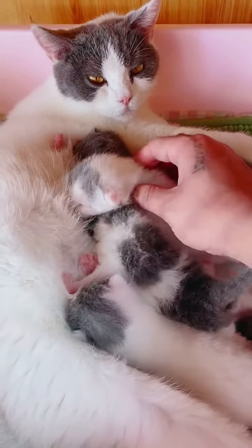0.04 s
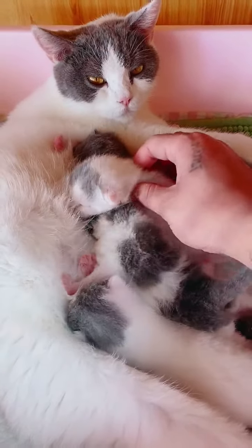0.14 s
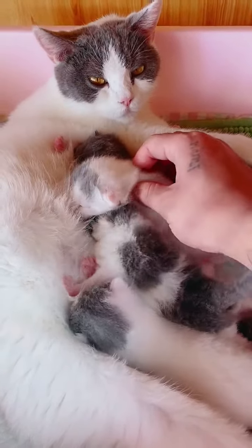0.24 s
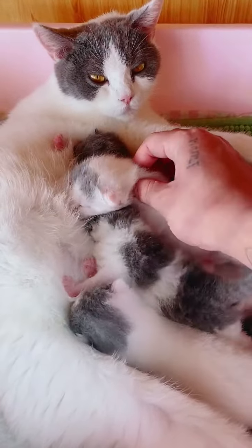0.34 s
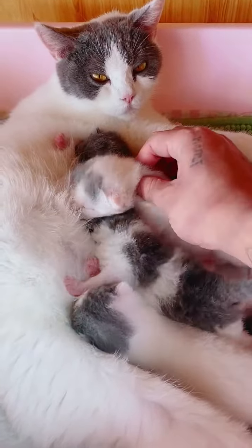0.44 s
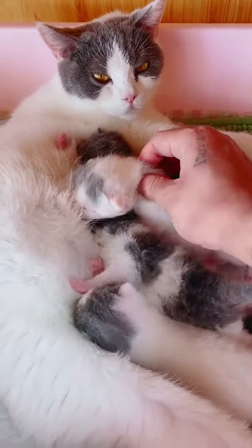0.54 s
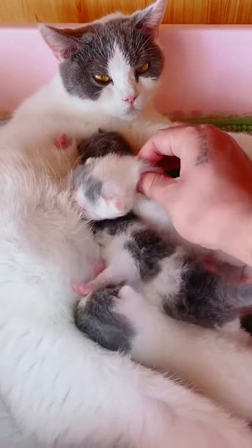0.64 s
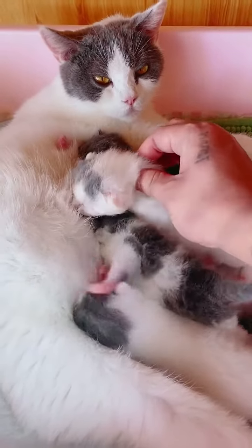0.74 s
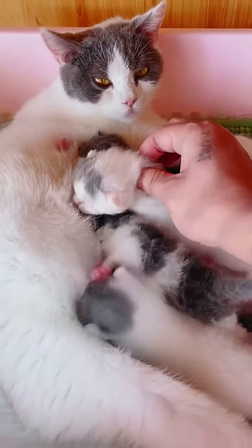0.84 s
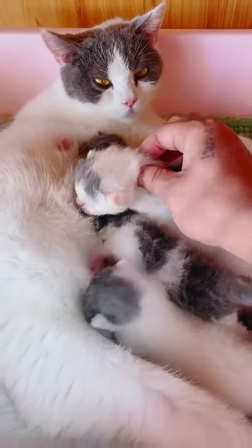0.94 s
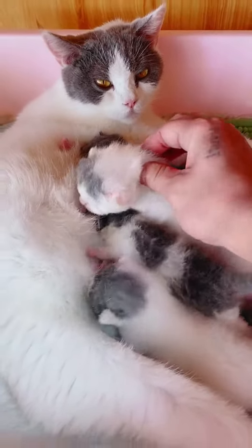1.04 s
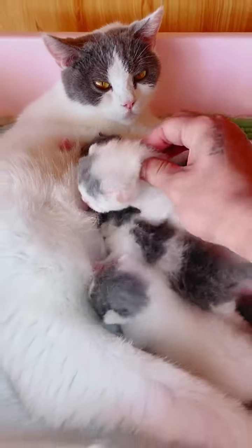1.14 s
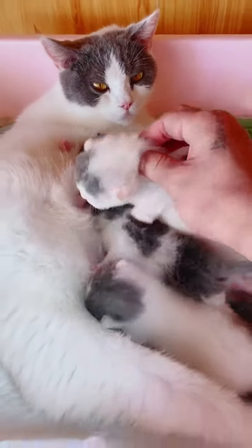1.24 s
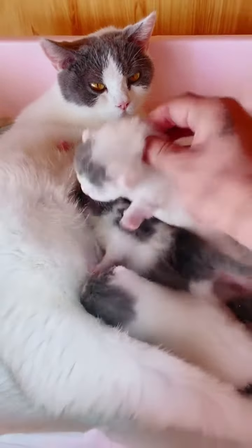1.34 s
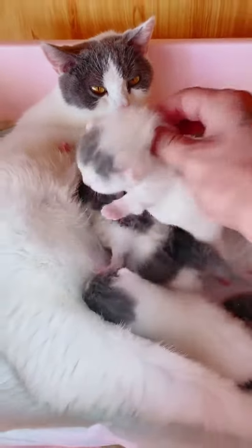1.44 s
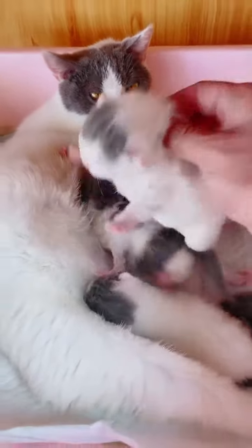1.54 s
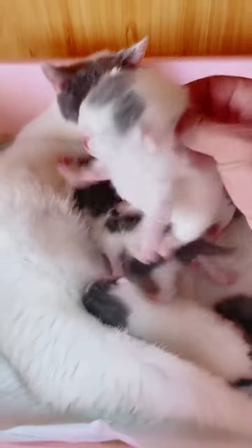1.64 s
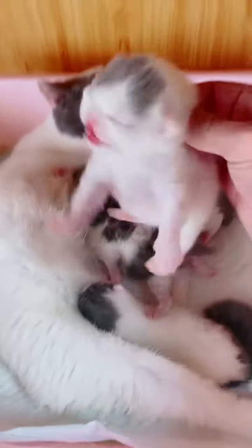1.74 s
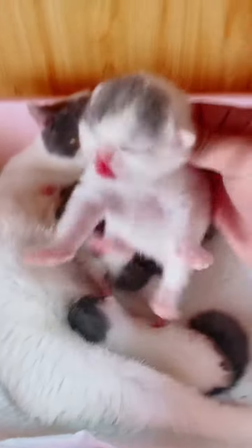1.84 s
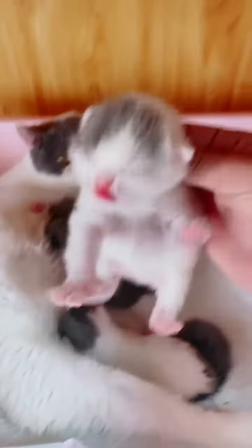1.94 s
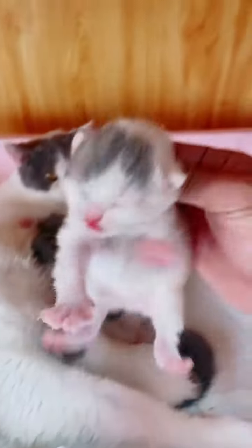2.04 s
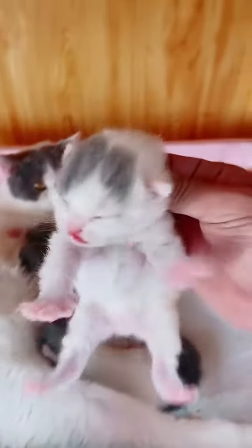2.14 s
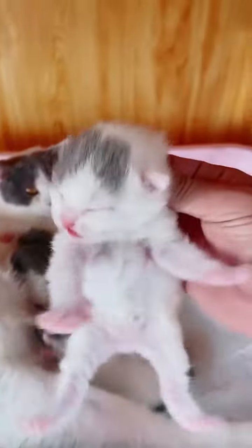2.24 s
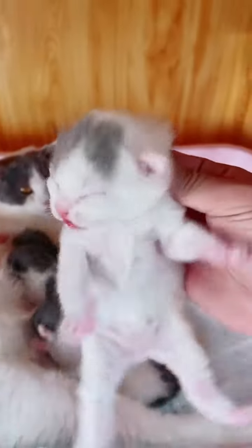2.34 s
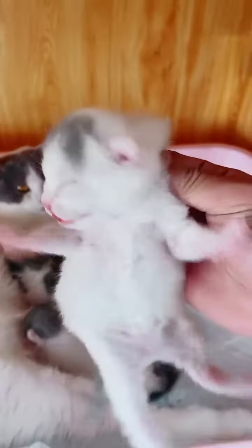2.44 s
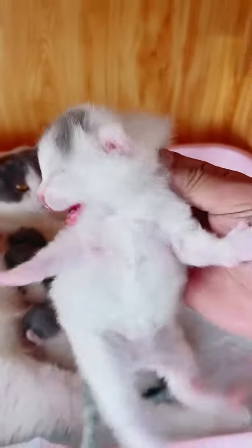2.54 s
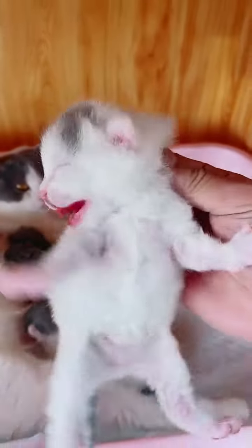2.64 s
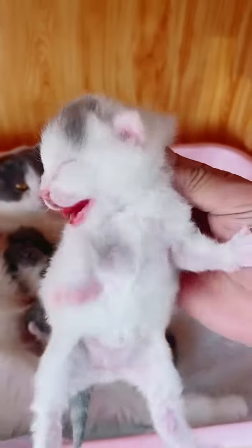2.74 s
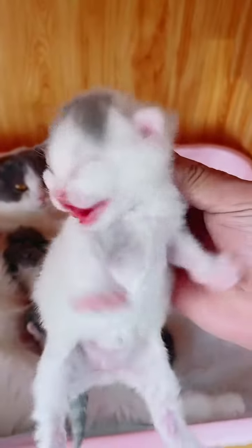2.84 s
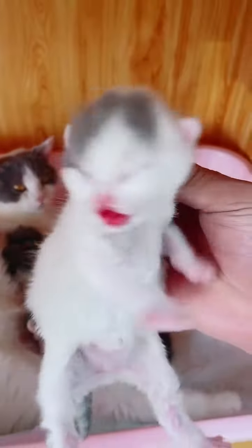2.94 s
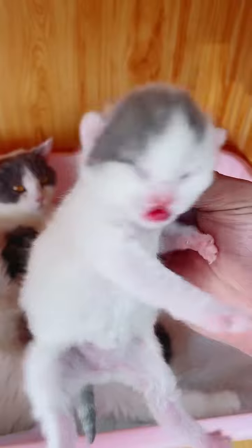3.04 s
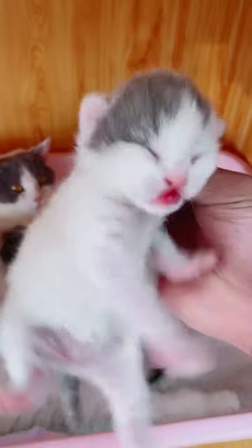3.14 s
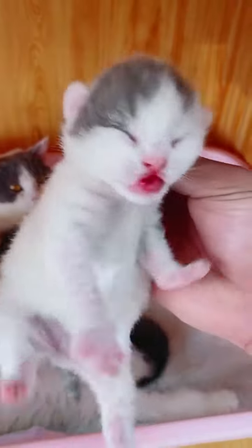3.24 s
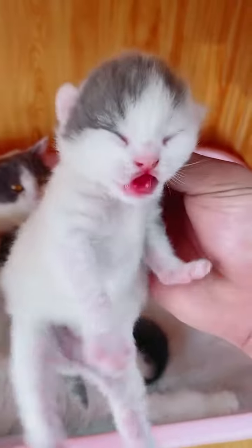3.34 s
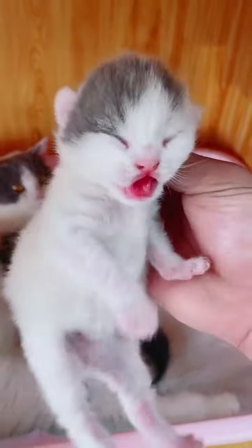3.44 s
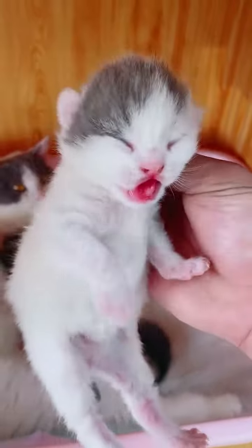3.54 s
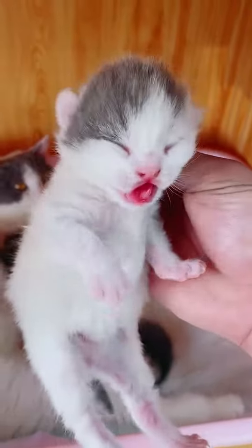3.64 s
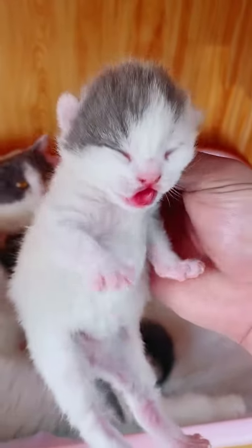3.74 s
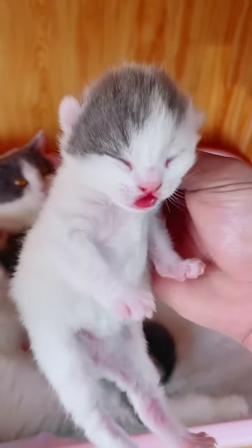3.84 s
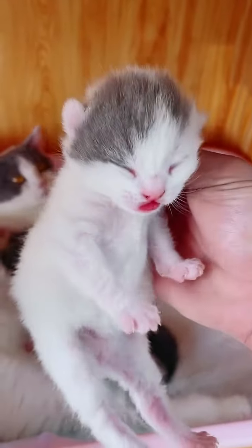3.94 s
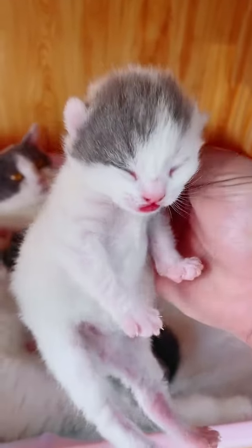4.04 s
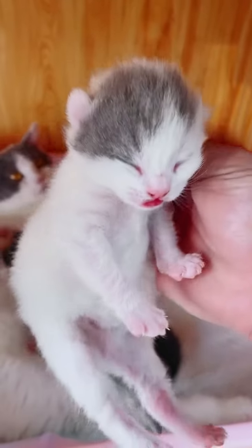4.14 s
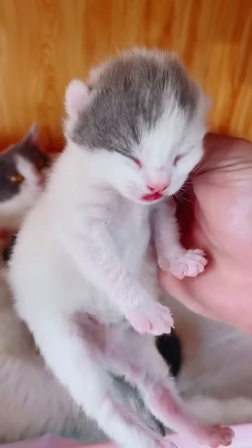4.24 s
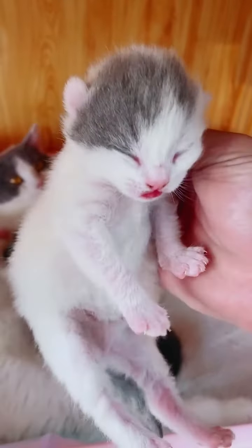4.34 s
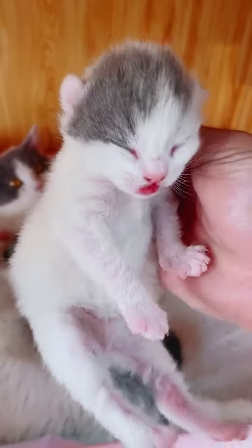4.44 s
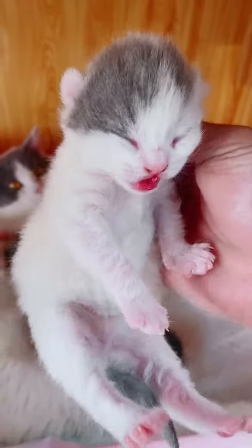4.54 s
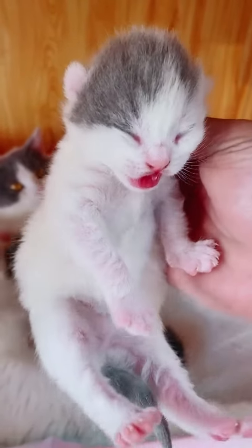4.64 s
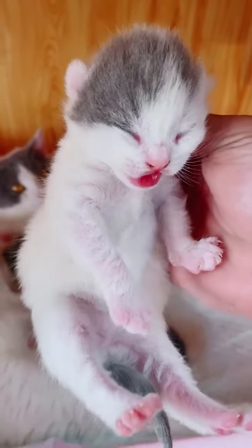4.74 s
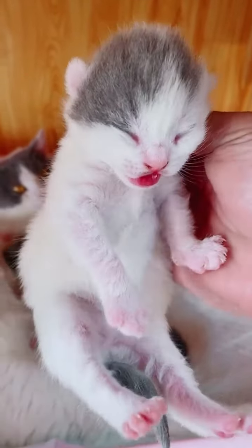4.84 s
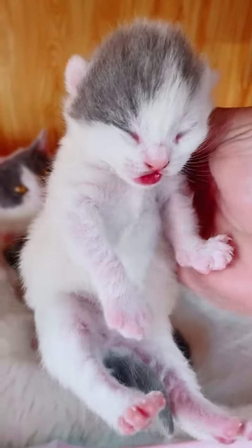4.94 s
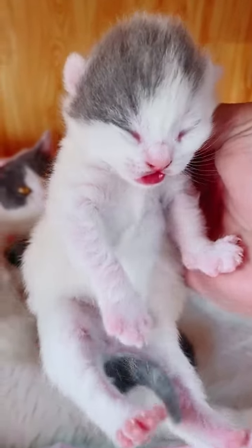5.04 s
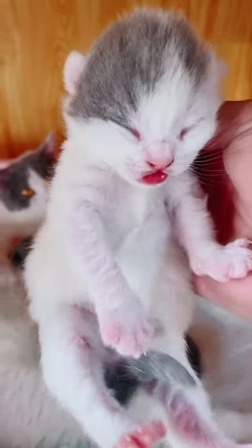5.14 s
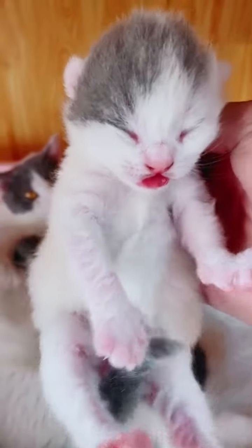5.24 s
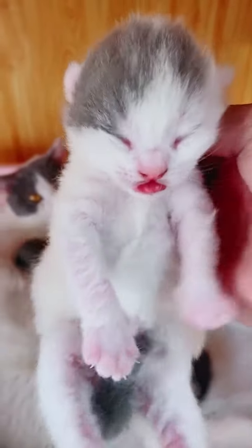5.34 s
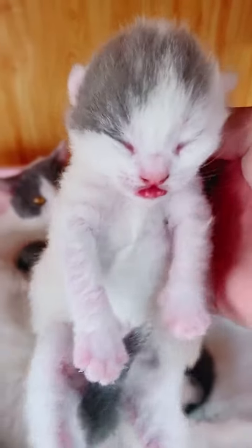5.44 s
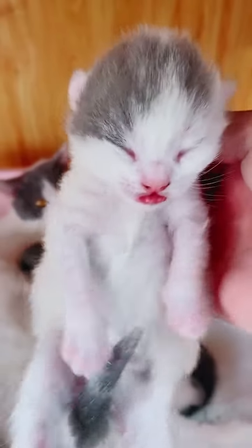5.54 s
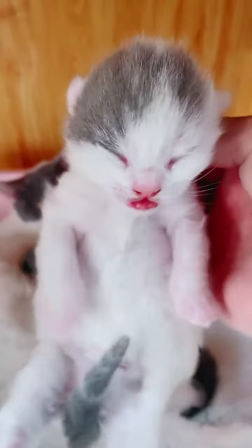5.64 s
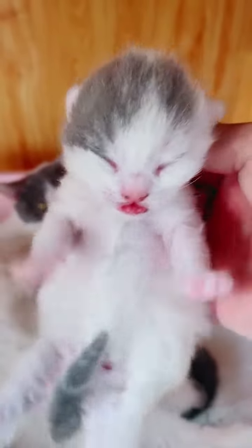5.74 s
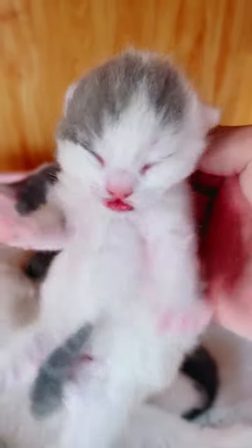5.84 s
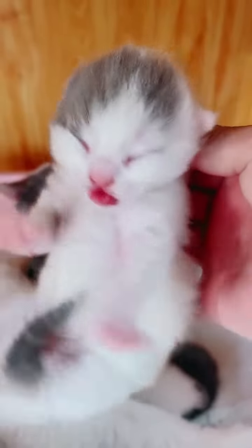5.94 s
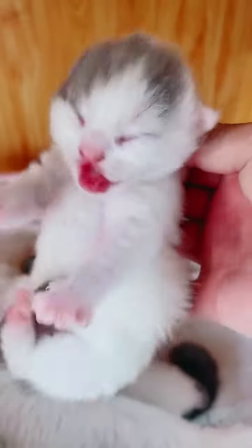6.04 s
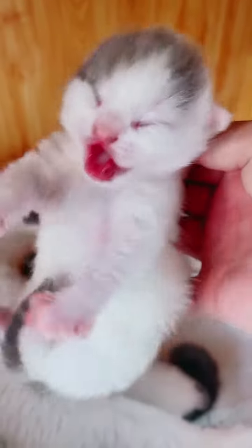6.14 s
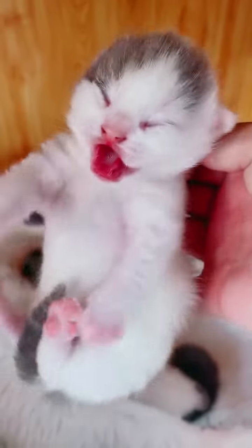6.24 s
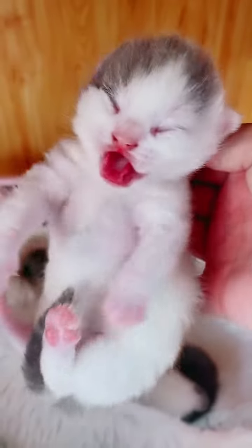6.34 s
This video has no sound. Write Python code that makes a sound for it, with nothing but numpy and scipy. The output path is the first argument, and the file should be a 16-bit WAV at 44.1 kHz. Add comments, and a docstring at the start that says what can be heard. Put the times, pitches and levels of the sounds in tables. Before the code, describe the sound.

Close, dry sound in a small quiet room: soft hiss, low rumble, faint mains hum and a mother cat's deep fluttering purr, about 27 throbs a second. A low muted scuff comes at 0.24 s. From 0.45 to 0.95 s a newborn kitten gives a weak, hoarse squeak that jumps high and sinks. Fur rustles near 1.3 s. A clearer, piercing mew runs 1.5-2.1 s, with wet pops, then a tiny rising chirp at 2.15 s. The loudest, longest crying spans 2.55-3.9 s: two joined mews, the first sliding down, the second lifting, turning brighter, then falling into rasp. A distinct wet pop and rustle follow around 4.3 s. Another mew swells at 4.5 s and droops hoarsely until 5.35 s, with a low scuff at 5.06 s. Rustling and a tick lead to a final cry from 6 s, climbing fast after a strong pop at 6.16 s, held high and cut off at 6.4 s.

```python
"""A newborn kitten mews seven times close to the microphone in a small quiet room: harmonics of its vocal folds,
hoarse rasp and breath pass a throat with two sliding mouth resonances. Its mother's purr is a train of thumps
ringing in her chest. Wet pops are falling chirps, ticks are damped sines, and two low scuffs are shaped noise.
Fur rustle swells in the room hiss, with low rumble and a wavering mains hum underneath."""
import sys
import numpy as np
from scipy import signal
from scipy.io import wavfile
from scipy.ndimage import uniform_filter1d

SR = 44100
rng = np.random.default_rng(int(sys.argv[2]) if len(sys.argv) > 2 else 0)


def digitize_waveform(pressure):
    """Quantize a signal to 16-bit integers and store it at the path in sys.argv[1].

    Rows of a 2-D input are taken as channels; values are limited to [-1, 1].
    """
    field = np.atleast_2d(pressure).T
    bounded = np.clip(field, -1, 1)
    quanta = np.round(bounded * 32767).astype(np.int16)
    wavfile.write(sys.argv[1], SR, quanta)


def field_ratio(decibels):
    """Amplitude ratio for a level in dB (20 dB per decade); scalars and array-likes work."""
    return 10 ** (np.asarray(decibels, dtype=float) / 20)


N = 281799

# The kitten's voice, one list of rows a mew. Each row: time in seconds, pitch in Hz, effort (level of the
# partials below the treble) in dB, treble level against the effort in dB, lower and upper mouth resonance
# in Hz, hoarseness from 0 to 1.
MEWS = [
    [(.44, 682, -43, -21, 2220, 3480, 0.7), (.474, 715, -30.5, -39, 2340, 3440, 0.72),
     (.5, 809, -34, -35, 2100, 3300, 0.34), (.55, 1257, -33, -18, 2200, 3550, 0.77),
     (.572, 1051, -24, -20, 2050, 3540, 0.94), (.606, 785, -21.5, -18.5, 2230, 3300, .7),
     (.634, 678, -24.5, -16, 2280, 3320, 0.99), (.672, 682, -21.5, -18, 2200, 3360, 0.32),
     (.7, 564.4, -23, -22, 2400, 3230, .5), (.734, 567, -23.5, -24, 2550, 3300, 0.58),
     (.792, 630, -23.5, -26, 2880, 3380, .45), (.82, 578.6, -22.5, -34, 2700, 3350, 0.93),
     (.85, 586.6, -28, -27, 2620, 3356, 0.83), (.88, 600.3, -31, -27, 2450, 3380, .98),
     (.904, 586, -34.5, -27, 2340, 3400, 0.99), (.95, 548, -39.5, -20, 2250, 3450, 0.8)],
    [(1.53, 412, -35.5, -23, 2457, 3780, 0.84), (1.57, 684, -28, -29, 2583, 3770, 1),
     (1.6, 550, -33.5, -20, 2376, 3870, 0.86), (1.62, 669, -34.5, -20, 2250, 3995, 0.8),
     (1.672, 1070, -26.5, -23, 2370, 4300, 0.18), (1.7, 1050, -28.5, -28, 2720, 3610, 1),
     (1.727, 920, -19.5, -38, 2160, 3266, 0.71), (1.729, 1185, -14.5, -22, 2560, 3500, 1),
     (1.75, 1078, -12, -20, 2590, 3470, 0.14), (1.795, 1072, -13.5, -14.5, 2530, 3420, 0.012),
     (1.805, 1090, -2.5, -24.5, 2655, 3340, 0.0093), (1.831, 1085, -15, -21, 2420, 3580, .01),
     (1.853, 1058, -7, -26, 2540, 3260, 0.012), (1.875, 1041, -20, -11.5, 2850, 3250, 0.047),
     (1.982, 893, -24.5, -19, 1890, 3300, 0.41), (2.024, 662, -26.5, -37, 1907, 3580, 0.24),
     (2.068, 655, -32.5, -22, 2210, 3494, 0.38), (2.102, 509, -31, -25, 1724, 3455, 0.32),
     (2.135, 479, -32.5, -39, 1575, 3375, 0.32)],
    [(2.14, 779, -43, -35, 1943, 4166, 0.31), (2.165, 870, -32, -29, 2170, 4006, 0.86),
     (2.18, 1034, -32, -34, 2310, 3984, .95), (2.198, 1186, -30, -32, 2320, 4060, 1),
     (2.22, 1154, -36, -28, 2290, 3700, 0.94)],
    [(2.545, 479, -39, -30, 2340, 3580, 0.88), (2.575, 640, -26, -29, 2334, 3710, 0.96),
     (2.598, 756, -16, -34, 2323, 3890, 0.76), (2.645, 830, -27, -22, 2470, 4370, 0.61),
     (2.647, 1038, -24.5, -31, 2220, 3970, 0.63), (2.688, 1050, -15.5, -18, 2230, 4020, .15),
     (2.691, 1007, -3.5, -17.5, 2960, 3940, 0.043), (2.734, 1009, -2.5, -22.5, 2760, 3670, 0.017),
     (2.814, 967.4, -11.5, -14.5, 2876, 3680, 0.045), (2.87, 941, -2.5, -24.5, 2940, 3770, .06),
     (2.885, 946, -11, -14, 2800, 3630, 0.13), (2.937, 898, -4, -27, 2916, 3545, 0.12),
     (2.995, 821, -5.5, -21, 2810, 3200, 0.077), (3.035, 769, -5.5, -24, 2920, 3090, 0.4),
     (3.092, 742, -14, -11, 2905, 3720, 0.25), (3.152, 777, -19.5, -24.5, 2093, 3830, 0.13),
     (3.22, 715, -29.5, -16, 2120, 3730, 0.064)],
    [(3.22, 710, -30, -23, 2300, 3530, 0.097), (3.24, 756, -24, -21, 2340, 3570, 0.084),
     (3.27, 906, -10.5, -20, 2534, 3600, 0.088), (3.3, 865.7, -8, -20, 2534, 3425, 0.45),
     (3.394, 856.3, -7, -13, 2620, 3820, .33), (3.428, 848, -6.5, -15, 2634, 4060, 0.25),
     (3.46, 913, -7, -10, 2700, 4100, 0.12), (3.498, 920, -10, -9.5, 2930, 3960, 0.06),
     (3.548, 966, -7.5, -8.5, 2820, 3890, 0.062), (3.568, 959, -4, -13.5, 2700, 3980, 0.075),
     (3.61, 860, -9.5, -9, 2670, 4150, 0.082), (3.64, 853, -9, -14, 2550, 3870, .12),
     (3.694, 812, -14.5, -9, 2430, 4250, .13), (3.727, 801.4, -14, -5.5, 2370, 4330, 0.14),
     (3.77, 759, -15.5, -10, 2414, 4050, 0.18), (3.806, 694, -20.5, -10.5, 2740, 4550, 0.23),
     (3.856, 511, -26.5, -15, 2470, 4240, 0.37), (3.885, 505, -35.5, -10, 2495, 4100, 0.62),
     (3.92, 462, -31.5, -11, 2550, 4110, 1)],
    [(4.49, 305, -33, -25, 2470, 4050, .88), (4.504, 366, -25.5, -28, 2400, 3910, .8),
     (4.53, 488, -21, -26, 2333, 3915, 0.79), (4.61, 684, -16.5, -18, 2510, 3940, 0.5),
     (4.647, 757, -16.5, -18, 2223, 3560, 0.48), (4.65, 778, -9, -4.5, 2384, 4080, 0.31),
     (4.691, 833, -7.5, -9, 2350, 4080, .26), (4.74, 786, -5.5, -11, 2400, 4000, 0.28),
     (4.775, 777, -9, -7.5, 2400, 3870, 0.33), (4.79, 747, -11, -6, 2350, 3740, .14),
     (4.86, 710, -14.5, -4.5, 2800, 4180, 0.25), (4.932, 653, -12, -6.5, 2630, 3700, 0.17),
     (5.002, 602, -18, -7, 2544, 3775, 0.11), (5.068, 559, -16.5, -18, 2400, 3413, 0.51),
     (5.096, 550.5, -19.5, -15, 2586, 3400, 0.77), (5.135, 470, -24, -22, 2150, 3500, 1),
     (5.185, 534.4, -21, -17, 2350, 3950, .55), (5.256, 452, -21, -24, 2370, 3745, 0.42),
     (5.29, 457, -23.5, -24, 2280, 4024, .57), (5.322, 461.4, -24, -26, 2330, 4030, 0.28),
     (5.33, 477, -28.5, -24, 2320, 3880, 0.61), (5.36, 489, -38.5, -12, 2290, 3920, 0.68)],
    [(5.978, 164, -50, -39, 2300, 3680, 0.14), (5.99, 205.3, -32, -34, 2330, 3860, 0.36),
     (6.019, 351.5, -22.5, -21, 2452, 3820, 0.22), (6.06, 540, -26.5, -13, 2466, 3700, 0.61),
     (6.102, 728, -22, 0.5, 2390, 3720, 0.6), (6.128, 800, -10.5, -8.5, 2796, 4320, .5),
     (6.158, 909, -9.5, -7.5, 2870, 4030, 0.43), (6.199, 955, -10.5, -7.5, 2865, 4440, 0.23),
     (6.235, 977.7, -7.5, -10, 2870, 4100, 0.03), (6.31, 980.3, -8, -11, 2630, 4160, 0.018),
     (6.342, 1006, -10, -8, 2860, 4160, 0.022), (6.39, 986, -12.5, -7, 2730, 4300, 0.031)],
]
TREBLE_HZ = 5500  # the treble of the voice starts here


def evened(x):
    """Scales to rms 1."""
    return x / np.sqrt(np.mean(x ** 2) + 1e-20)


def read(points, hz):
    """Reads a spectrum table at the frequencies hz, along a log frequency axis."""
    f, value = np.transpose(points)
    return np.interp(np.log(hz + 1), np.log(f + 1), value)


def columns(rows, t):
    """Reads every column of a curve table at the times t."""
    s, *rest = np.transpose(rows)
    return [np.interp(t, s, c) for c in rest]


def drift(shape, span_s):
    """Smoothed chance of rms 1; a longer span drifts more slowly."""
    size = max(int(span_s * SR), 1)
    return evened(uniform_filter1d(uniform_filter1d(rng.standard_normal(shape), size), size))


def noise(db_at):
    """Noise whose short-time spectrum in dB is db_at(hz, t)."""
    frames = N // 128 + 5
    hz = np.fft.rfftfreq(512, 1 / SR)[:, None]
    a, b = rng.standard_normal((frames, 257, 2)).T
    white = a + 1j * b
    shaped = white * field_ratio(db_at(hz, np.arange(frames) * 128 / SR))
    unit = np.std(signal.istft(white, nperseg=512, noverlap=384)[1])
    return signal.istft(shaped, nperseg=512, noverlap=384)[1][:N] / unit


def band_db(db, hz, lo_hz, hi_hz):
    """Level that the spectrum db gives to white noise of rms 1 inside a band."""
    inside = (hz >= lo_hz) & (hz < hi_hz)
    return 10 * np.log10((field_ratio(db) ** 2 * inside).mean(0) + 1e-20)


def sounding(tables, t, fade_s):
    """1 while any table plays, with soft edges."""
    on = sum((t >= rows[0][0] - fade_s / 2) & (t <= rows[-1][0] + fade_s / 2) for rows in tables)
    return uniform_filter1d((on > 0) * 1., max(int(fade_s / t[1]), 1))


def kitten():
    """Vocal-fold harmonics and breath pass a throat whose resonances slide as the mouth moves."""
    t = np.arange(N) / SR
    gate = sounding(MEWS, t, 0.0048)
    on = gate > 0
    pitch, *_, hoarse = mew_controls(t)
    jitter = 0.029 * hoarse * drift(N, .001) + .003 * drift(N, 0.0116)
    turns = (np.cumsum(uniform_filter1d(pitch, 300) * (1 + jitter)) / SR)[on]

    # the strengths of the partials are drawn on a slower clock
    slow = t[::64]
    hoarse_slow = hoarse[::64]
    pitch, effort_db, treble_db, first_db, *mouth, _, _ = (uniform_filter1d(c, 5) for c in mew_controls(slow))
    first_db = uniform_filter1d(first_db, 30)  # the nasal fundamental moves slowly
    k = np.arange(1, 49)[:, None]
    hz = k * pitch
    flutter = evened(uniform_filter1d(rng.standard_normal((len(k), len(slow))), 12))  # each partial wavers alone
    size = field_ratio(throat_db(hz, pitch, *mouth) + 2.22 * flutter) * (hz < 16000) * (k > 1)
    rasp = evened(uniform_filter1d(rng.standard_normal(size.shape), 2))
    size *= field_ratio(5.2 * hoarse_slow * np.clip(hz / 4500, 0, 1.5) * rasp)  # hoarse folds scatter the upper partials

    # effort and treble set the level of the partials on either side of TREBLE_HZ
    high = hz > TREBLE_HZ
    for part, db in ((~high, effort_db), (high, effort_db + treble_db)):
        power = (size ** 2 * part).sum(0)
        size = np.where(part, size * field_ratio(db) * np.sqrt(2 / (power + 1e-12)), size)
    size *= field_ratio(top_db(hz, slow))
    breakup_db = 12 * hoarse_slow * np.minimum(flutter[0] - .3, 0)  # a hoarse fundamental breaks up
    size[0] = field_ratio(first_db + breakup_db) * np.sqrt(2)

    blur = 3.2 * (hoarse_slow - .05) * (hz / 9000) ** 3  # the highest partials lose their phase
    phase = -.3 * k - .03 * k ** 2 + blur * rng.standard_normal(size.shape)  # one sharp pulse a cycle
    tone = np.zeros(N)
    for n, a, p in zip(k[:, 0], size, phase):
        angle = 2 * np.pi * n * turns + np.interp(t[on], slow, p)
        tone[on] += np.interp(t[on], slow, a) * np.cos(angle)

    def breath_db(f, s):
        """Breath has a sharpened throat colour and its own balance of treble."""
        pitch, effort, treble, _, *mouth, under, _ = mew_controls(s)
        shape = 4.1 * throat_db(f, pitch, *mouth)
        low = band_db(shape, f, 1400, TREBLE_HZ)
        top = band_db(shape, f, TREBLE_HZ, 15500)
        balance = np.where(f < TREBLE_HZ, -low, treble + 10.0 - top)
        return shape + top_db(f, s) + effort + under + balance

    puffs = np.ones(N)
    puffs[on] += 0.11 * np.cos(2 * np.pi * turns)  # air escapes once a cycle
    shimmer = field_ratio((.25 + 2.2 * hoarse) * drift(N, .002))  # uneven closing of the folds
    return gate * (tone * shimmer + puffs * noise(breath_db))


def mew_controls(t):
    """Pitch, effort, treble, fundamental, mouth, breath and hoarseness at the times t."""
    # Strength of the upper mouth resonance beside the lower. Each row: time in seconds, level in dB.
    upper_strength = [(.44, -12), (.58, -10.5), (.67, 8), (.79, -14.5), (.95, -2), (1.53, -2), (1.6, -11),
                      (1.7, -2), (1.727, -31), (1.73, 8), (1.79, -14), (1.805, 4.5), (1.85, -14),
                      (1.89, -12.5), (2.1, -23), (2.18, -13), (2.22, -9), (2.57, -7.5), (2.67, -12),
                      (2.73, 6.5), (2.87, -10), (2.905, 3), (2.94, -10), (3.035, -20), (3.1, -11),
                      (3.15, -23), (3.27, -14), (3.3, 0.5), (3.46, 8.5), (3.6, 4), (3.66, -2), (3.77, 1),
                      (3.86, -2), (3.92, 4), (4.5, -10), (4.69, -3.5), (4.77, -0.5), (4.86, -8.5),
                      (4.93, 1), (5.0, -13), (5.1, -7), (5.19, -11), (5.27, -17.5), (5.36, -4), (6.0, -7.5),
                      (6.08, -2), (6.1, -21), (6.13, 5), (6.23, 1.2), (6.31, 3.5), (6.39, -2.5)]
    clear_db, hoarse_db = -38, -14.5  # breath against the effort, clear and fully hoarse
    knee_hz, db_per_octave = 640, 22  # the fundamental fades when the pitch sinks under the knee
    pitch, effort, treble, low_hz, high_hz, hoarse = columns(sum(MEWS, []), t)
    hoarse = np.clip(hoarse, 0, 1)
    breath = clear_db + (hoarse_db - clear_db) * np.sqrt(hoarse)
    fade_db = db_per_octave * np.minimum(np.log2(pitch / knee_hz), 0)
    first = -32 + 0.2 * effort + fade_db  # the nasal fundamental follows the effort a little
    return pitch, effort, treble, first, low_hz, high_hz, *columns(upper_strength, t), breath, hoarse


def throat_db(hz, pitch, low_hz, high_hz, high_db):
    """Two mouth resonances on the colour of the throat, whose treble part shifts with the pitch."""
    # Colour of the kitten's throat and mouth. Each row: frequency in Hz, relative level in dB.
    throat_colour = [(400, -33), (1200, 12.5), (1800, 2.5), (2200, 7), (4500, 8), (5100, 5), (5600, 12.5),
                     (6400, 9), (7800, 14), (8600, -1), (10200, -2.5), (11800, -6), (12800, -10),
                     (14500, -12), (15800, -14)]
    low_width_hz, high_width_hz = 623, 865

    def peak(centre, width):
        return 1 / (1 + ((hz - centre) / width) ** 2) ** 3.14

    both = peak(low_hz, low_width_hz) + field_ratio(high_db) ** 2 * peak(high_hz, high_width_hz)
    skirt = field_ratio(-22.5) ** 2 * (hz < low_hz) * (hz > 1300)  # low partials leak through the nose
    stretch = np.clip(pitch / 900, .4, 1.2) ** 0.26  # the larynx rises with the pitch and shortens the throat
    below = read(throat_colour, hz) + 10 * np.log10(both + skirt)
    above = read(throat_colour, np.maximum(hz / stretch, TREBLE_HZ))
    return np.where(hz < TREBLE_HZ, below, above)


def top_db(hz, t):
    """Level around the start of the treble and in the highest band, changing from mew to mew."""
    # Treble colour. Each row: time in seconds, dB of a broad bell at 5780 Hz (negative dips), dB above 8720 Hz.
    treble_colour = [(.6, -4, 3), (1.6, 7.5, 1), (1.85, -4, 2), (2.75, -4.5, 1.5), (3.05, -7, -1),
                     (3.4, -5.5, 3.5), (3.7, 6, 5), (4.7, -8, 0.5), (5.0, -3.5, -6), (5.3, 7.5, -2),
                     (6.1, 2, -1), (6.3, 5, -11)]
    bell_db, air_db = columns(treble_colour, t)
    return bell_db * np.exp(-((hz - 5780) / 1040) ** 2) + air_db * (hz > 8720)


def room(x):
    """A few near bounces, then a faint sparse tail of random echoes that dies away."""
    # Nest walls and hand close to the mouth. Each row: delay in ms, level against the direct sound in dB.
    bounces = [(.9, -82.5), (2.3, -22.5), (4.1, -31), (7.7, -14.5), (12.5, -22.5)]
    tail_db, t60_s = -14, 0.14  # whole tail against the direct sound, time to fall by 60 dB
    taps, t = np.zeros(SR // 2), np.arange(SR // 2) / SR
    at = np.arange(600, SR // 2 - 20, 20)
    taps[at + rng.integers(0, 20, len(at))] = rng.choice([-1., 1.], len(at))
    taps *= field_ratio(-60 * t / t60_s)
    taps *= field_ratio(tail_db) / np.linalg.norm(taps)
    taps[0] = 1  # direct sound
    for ms, db in bounces:
        taps[round(ms * SR / 1000)] = field_ratio(db)
    return signal.oaconvolve(x, taps / np.linalg.norm(taps))[:N]


def purr():
    """The larynx shuts some 27 times a second and thumps the chest; uneven stretches blur into rumble."""
    # Loudness of the mother's purr. Each row: time in seconds, level in dB.
    purr_levels = [(0.0, -36), (0.19, -45), (0.25, -41.5), (0.64, -38.5), (0.69, -32), (1.56, -35),
                   (1.67, -49), (2.44, -36), (2.76, -40.5), (3.33, -30.5), (3.95, -42.5), (4.06, -37),
                   (4.59, -39), (5.02, -39), (5.09, -22.5), (5.23, -24), (5.32, -35), (5.77, -33),
                   (6.07, -58.5), (6.12, -28), (6.28, -53), (6.39, -55)]
    # Resonance of her chest. Each row: frequency in Hz, relative level in dB.
    chest = [(40, -47), (80, 7), (110, 3.5), (160, -1.5), (190, 12.5), (240, 2.5), (300, -17), (450, -48.5)]
    t = np.arange(N) / SR
    db, = columns(purr_levels, t)
    rate_hz = 27.0 * (1 + 0.033 * drift(N, 0.303))  # the throb changes pace slowly
    turns = np.cumsum(rate_hz * (1 + 0.1 * drift(N, .03))) / SR  # and stumbles quickly
    thumps = np.diff(np.floor(turns), prepend=0) * field_ratio(3.1 * drift(N, 0.023))
    gain_db = read(chest, np.fft.rfftfreq(8192, 1 / SR))
    log_gain = np.log(field_ratio(np.r_[gain_db, gain_db[-2:0:-1]]))
    ring = np.fft.ifft(np.exp(np.conj(signal.hilbert(log_gain)))).real[:4096]  # causal ring of the chest
    return field_ratio(db) * evened(signal.oaconvolve(thumps, ring)[:N])


def pops_and_ticks():
    """Pops: nearly four cycles gliding down. Ticks: damped sines, with a random crackle of fainter ones."""
    # Wet pops. Each row: start in seconds, level in dB.
    pop_list = [(1.537, -25.5), (1.695, -37), (1.799, -23.5), (1.849, -27), (1.95, -19.5), (2.077, -18),
                (2.236, -15), (3.055, -30), (3.888, -29), (4.296, -11.5), (6.162, -4.5)]
    # Dry ticks. Each row: start in seconds, level before the damping in dB, frequency in Hz.
    tick_list = [(.327, -29, 3400), (.393, -29, 4200), (1.729, -12, 3500), (2.171, -11, 4000),
                 (3.06, -9, 4000), (4.493, -19, 3200), (5.816, -25, 2600)]
    out, t = np.zeros(N + SR), np.arange(400) / SR
    glide = 443.1 * t + 1.74708 * (1 - np.exp(-t / 0.00072))  # cycles; the pitch sinks towards 443 Hz
    swell = np.sin(np.pi * np.clip(t / 0.0048, 0, 1)) ** 0.83
    pop = np.sin(2 * np.pi * glide) * swell
    for s, db in pop_list:
        out[round(s * SR):][:400] += field_ratio(db) * pop
    for s, db, hz in tick_list:
        out[round(s * SR):][:400] += field_ratio(db) * np.sin(2 * np.pi * hz * t) * np.exp(-t / .0005)

    # fur and claws: some 25 faint clicks a second
    strength = field_ratio(-44 + 4 * np.minimum(rng.exponential(1, N), 3))
    crackle = strength * (rng.random(N) < 25 / SR)
    click = np.sin(2 * np.pi * 3600 * t) * np.exp(-t / 0.0011)
    return out[:N] + signal.oaconvolve(crackle, click)[:N]


def scuffs():
    """Low noise whose colour sinks as it fades, with a slightly wavering level."""
    # Scuffs close to the microphone. Each row: start in seconds, rise in seconds, length in seconds,
    # level before the fade in dB, colour control at the start in Hz, tilt in dB an octave.
    scuff_list = [(0.238, 0.0025, 0.19, -26, 316, 0), (5.057, 0.016, 0.31, -13.5, 300.5, 0.5)]
    # Their colour while the control stands at 280 Hz. Each row: frequency in Hz, relative level in dB.
    scuff_colour = [(60, -30), (100, -13.5), (280, 6), (420, -6), (560, -4), (1200, -14), (1700, -14.5),
                    (2600, -49)]
    t, out = np.arange(N) / SR, np.zeros(N)
    for start, rise, length, level_db, first_hz, tilt_db in scuff_list:
        def colour_db(f, s):
            control_hz = first_hz * 0.79 ** np.clip((s - start) / length, 0, 1)
            shape = read(scuff_colour, f * (280 / control_hz) ** 0.37)  # the colour follows only in part
            shape = shape + tilt_db * np.log2(f / 500 + 0.12)
            return shape - band_db(shape, f, 130, 1300)

        u = np.clip((t - start) / length, 0, 1)
        envelope = np.clip((t - start) / rise, 0, 1) * (u < 1) * field_ratio(level_db - 27.5 * u ** 1.86)
        out += envelope * noise(colour_db)
    return out * field_ratio(0.47 * drift(N, 0.0027))


def hiss_levels(s):
    """Each stroke of fur moves the hiss fast and lets it settle back; the three bands also flicker."""
    # Strokes of fur rustle. Each row: start in seconds, fall time constant in seconds,
    # lift at 2-5 kHz in dB, lift at 9-15.5 kHz in dB (both before the stroke's envelope).
    rustle = [(.384, 0.041, 7, -7), (1.3, 0.055, 2, 23), (1.351, .05, 7.5, 3), (1.5, 0.11, 9, 12),
              (2.276, 0.062, 8, 17), (2.378, 0.083, 15, 16), (2.538, 0.18, -9, 7), (3.8, 0.57, 8, 10),
              (4.02, .04, 7, -7), (4.07, 0.031, 10, 8), (4.09, 0.037, 4, 12), (4.24, 0.12, 12.5, 18),
              (4.35, 0.23, 4, -11), (5.2, 0.37, 7.5, 5), (5.373, 0.026, 11, 16), (5.576, 0.086, 3, 7),
              (5.715, 0.047, 9, 16), (5.785, .02, -5, 14), (5.815, 0.05, 5, 11)]
    still_db = np.array([-45, -49, -68])  # still room at 0.3-1.3, 2-5 and 9-15.5 kHz
    rise_s, low_share = 0.013, 0.31  # the low band takes this share of the middle lift
    start, fall, mid_db, high_db = np.transpose(rustle)[:, :, None]
    after = np.maximum(s - start, 0)
    stroke = np.minimum(after / rise_s, 1) * np.exp(-after / fall)
    mid = (mid_db * stroke).sum(0)
    top = (high_db * stroke).sum(0)
    flicker = 1.5 * evened(uniform_filter1d(rng.standard_normal((3, len(s))), size=5))  # dB
    return still_db[:, None] + [low_share * mid, mid, top] + flicker


def background():
    """Room hiss that swells with the rustle of fur, in drifting patches, over low rumble and a wavering hum."""
    # Colour of the room hiss. Each row: frequency in Hz, relative level in dB.
    room_tone = [(15, -39), (25, -9), (36, -1), (53, 0), (86, -33), (130, -13), (194, -2), (333, -13.5),
                 (572, -14.5), (1390, -20.5), (2520, -18.5), (4690, -28.5), (5980, -36), (12100, -64),
                 (15800, -56)]
    # Mains hum. Each row: frequency in Hz, mean level in dB.
    hum_tone = [(49.8, -33)]

    def level_db(f, s):
        shape = read(room_tone, f)
        bands = [(300, 1300), (2000, 5000), (9000, 15500)]
        low, mid, top = (db - band_db(shape, f, *b) for db, b in zip(hiss_levels(s), bands))
        # blends between the three bands
        to_mid = np.clip(np.log(f / 1200 + 1e-9) / np.log(1.7), 0, 1)
        to_top = np.clip(np.log(f / 4500 + 1e-9) / np.log(2.2), 0, 1)
        level = shape + low + to_mid * (mid - low) + to_top * (top - mid)
        patches = uniform_filter1d(rng.standard_normal((len(f), len(s))), 8, 0)
        patches = uniform_filter1d(patches, 14, 1)
        return level + 1.24 * evened(patches) - 30 * (f < 130)

    t = np.arange(N) / SR
    (hz, db), = hum_tone
    hum_cycles = hz * t + 0.14 * drift(N, 0.0164)
    hum = field_ratio(db + 2 * drift(N, 0.011)) * np.sqrt(2) * np.sin(2 * np.pi * hum_cycles)
    low_pass_band = signal.butter(2, [48, 90], "bandpass", fs=SR, output="sos")
    rumble = signal.sosfilt(low_pass_band, rng.standard_normal(N))
    return noise(level_db) + hum + field_ratio(-39.5 + 0.83 * drift(N, 0.1)) * evened(rumble)


def scene():
    """One microphone feeds both channels; only the kitten passes through the room echoes."""
    mono = room(kitten()) + purr() + pops_and_ticks() + scuffs() + background()
    return np.array([mono, mono])


def low_pass(x):
    """Removes everything above the highest recorded frequency."""
    return signal.sosfilt(signal.butter(12, 16020, fs=SR, output="sos"), x)


def record(dry):
    """Microphone hiss, a low cut, gain control that turns everything down in loud moments, a soft ceiling."""
    hiss = field_ratio(-60.5) * rng.standard_normal(N)
    low_cut = signal.butter(4, 38, "highpass", fs=SR, output="sos")
    cut = signal.sosfilt(low_cut, dry + hiss)
    power_db = 10 * np.log10(abs(uniform_filter1d(cut[0] ** 2, 2000)) + 1e-12)
    over_db = uniform_filter1d(np.maximum(power_db + 24, 0), 2000)  # smoothed excess over -24 dB
    ducked = cut / field_ratio(0.23 * over_db)
    mix = ducked / (1 + abs(ducked) ** 6) ** (1 / 6)
    return low_pass(mix)


dry = scene()
out = record(dry)
digitize_waveform(out)
```